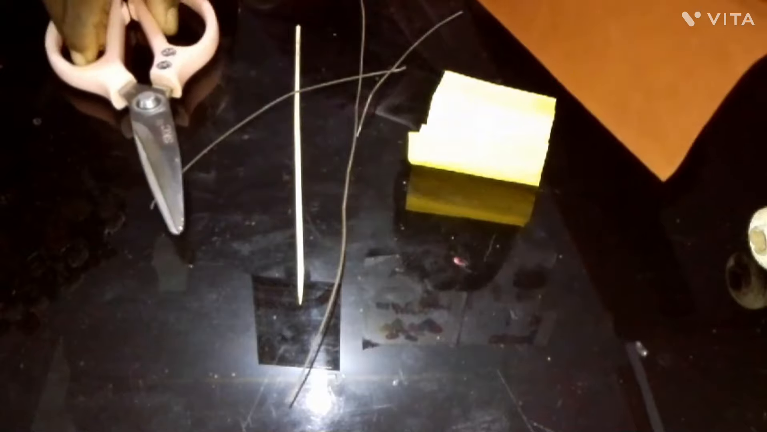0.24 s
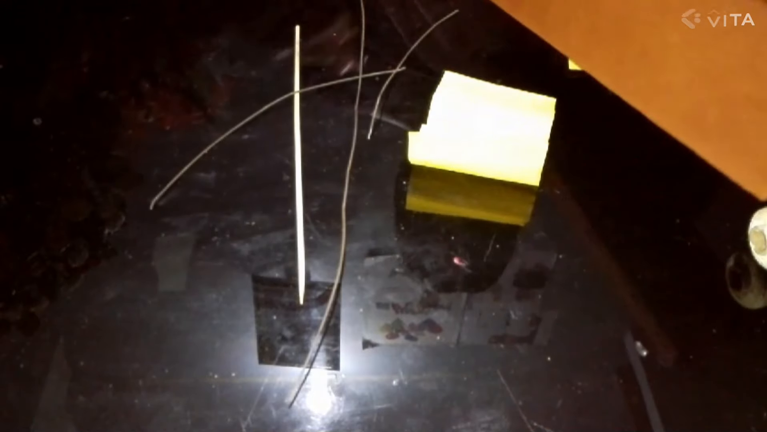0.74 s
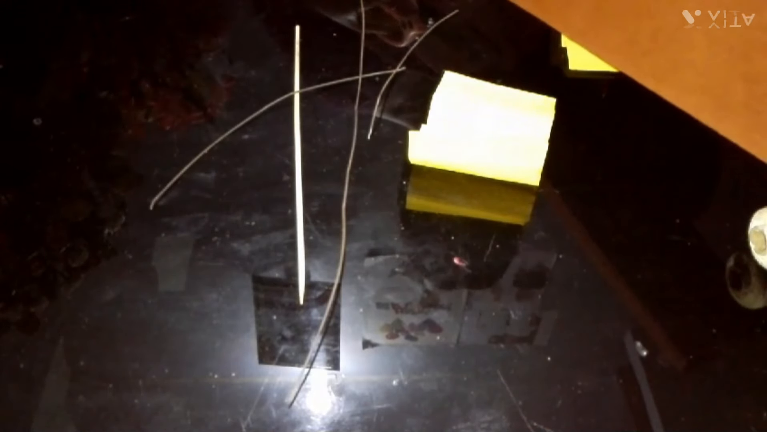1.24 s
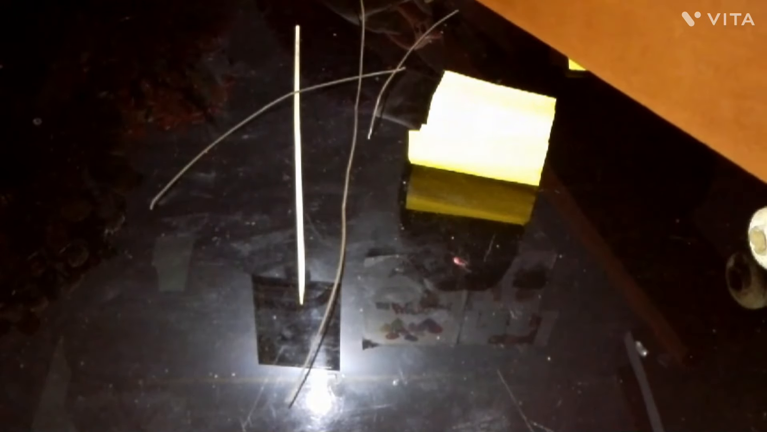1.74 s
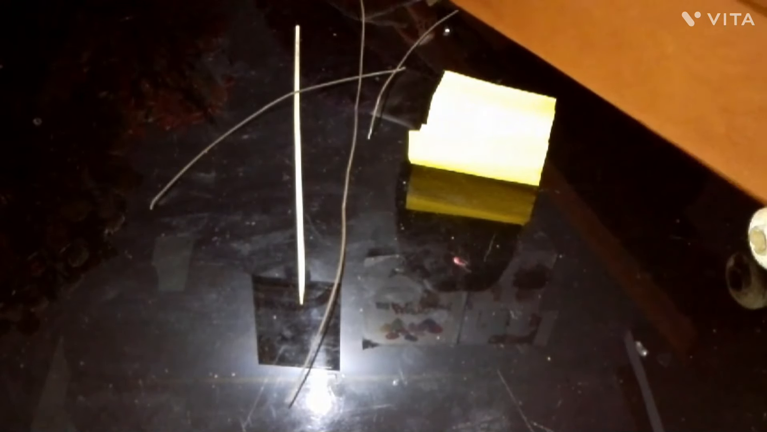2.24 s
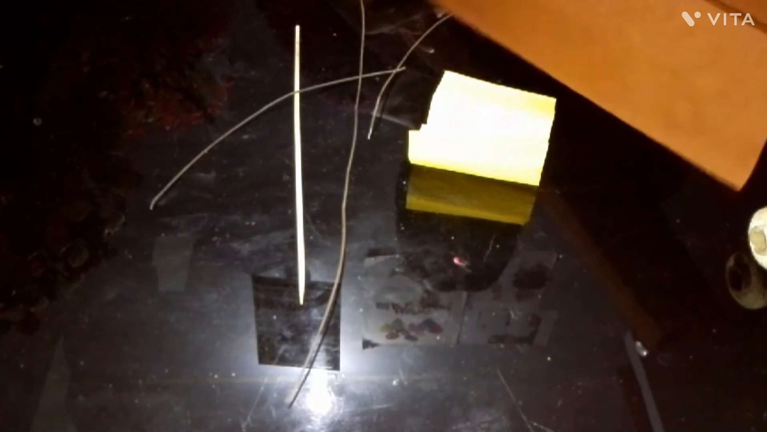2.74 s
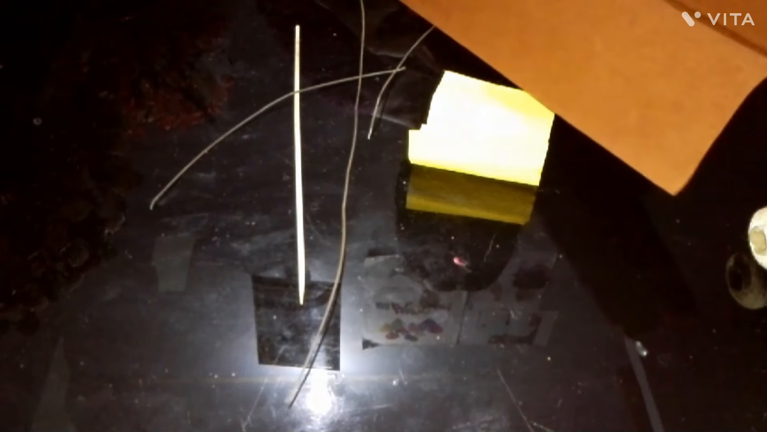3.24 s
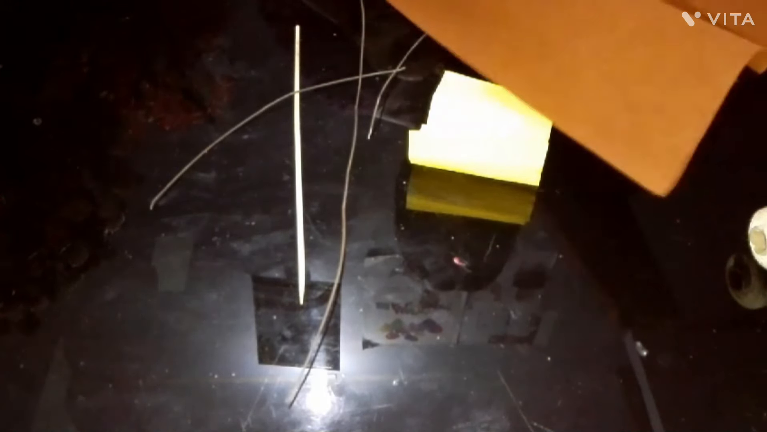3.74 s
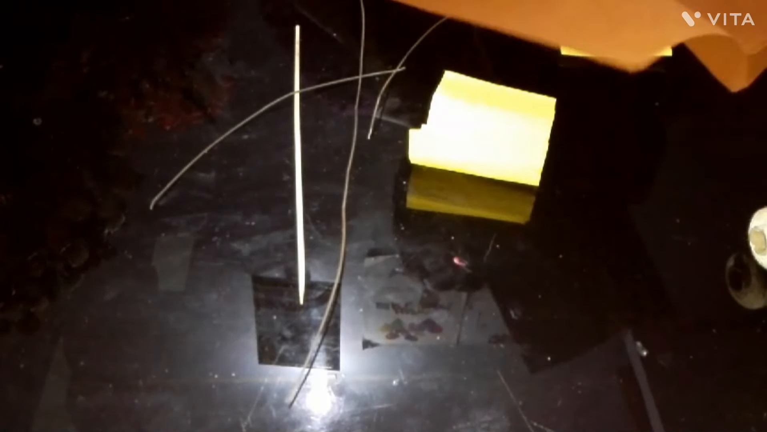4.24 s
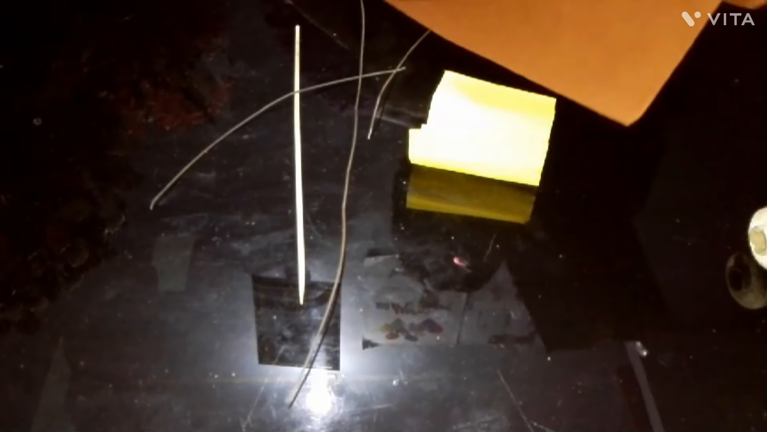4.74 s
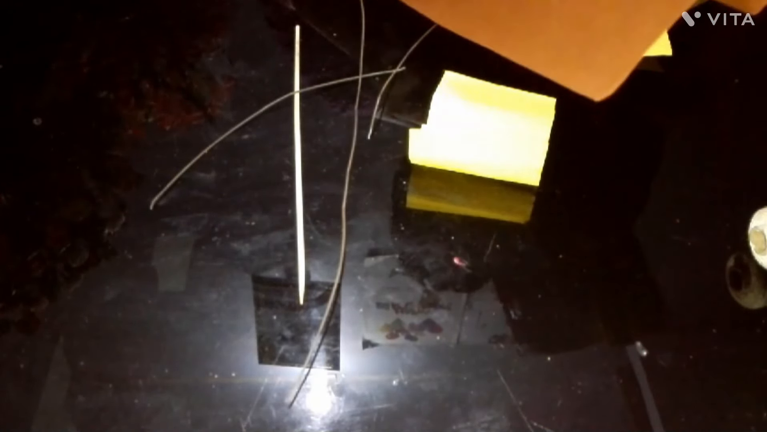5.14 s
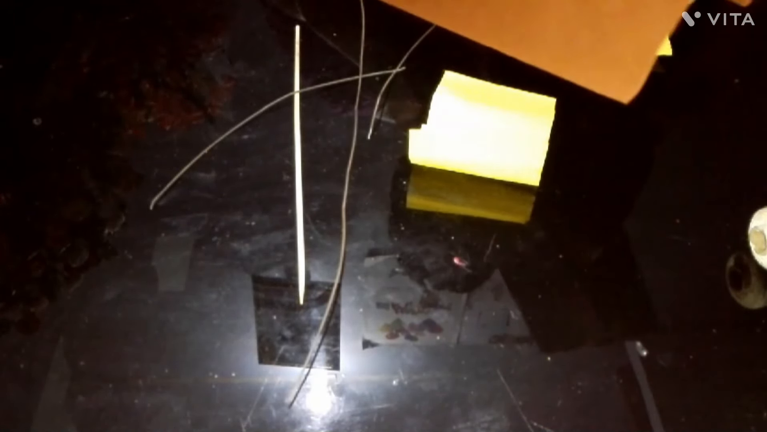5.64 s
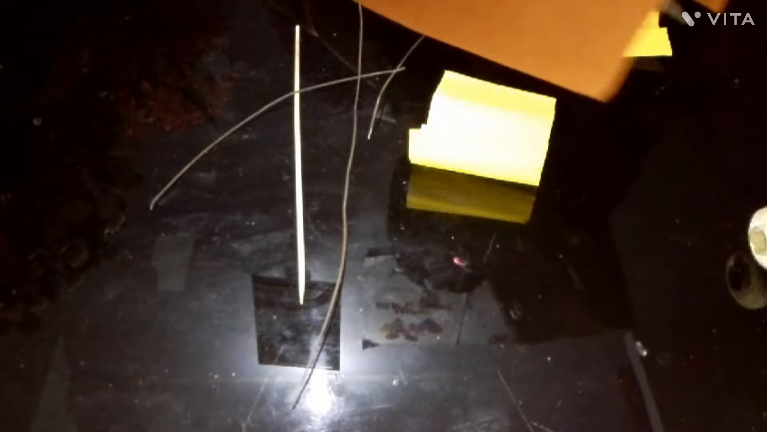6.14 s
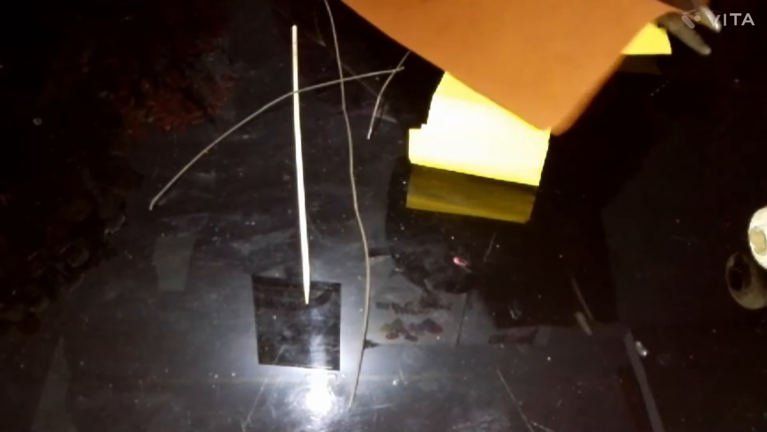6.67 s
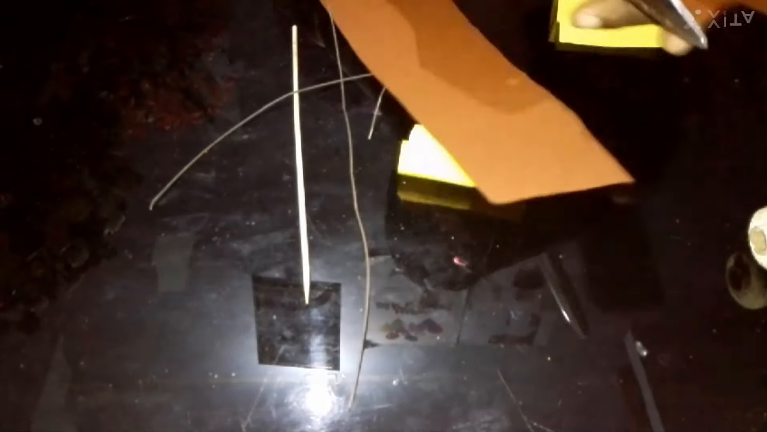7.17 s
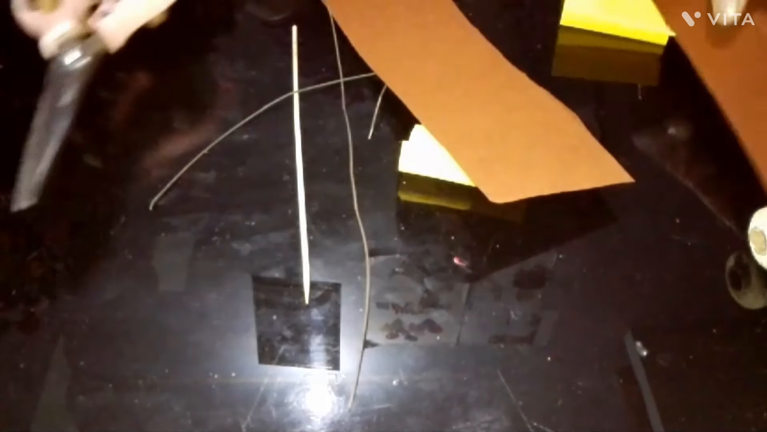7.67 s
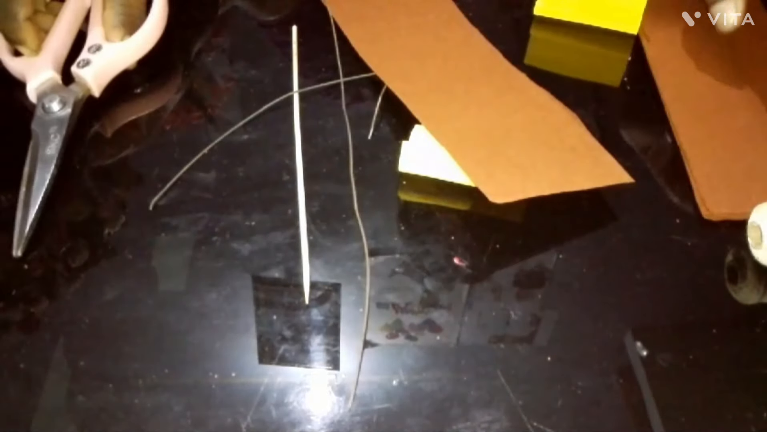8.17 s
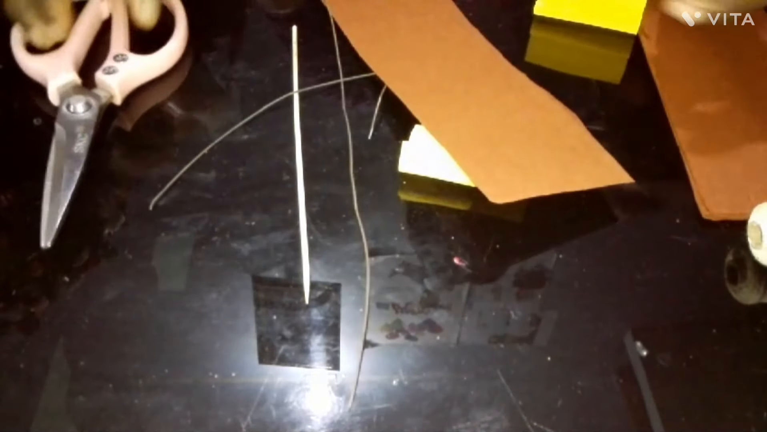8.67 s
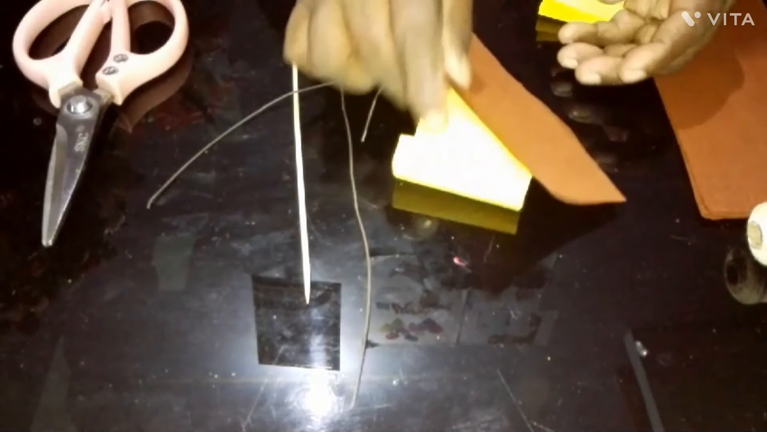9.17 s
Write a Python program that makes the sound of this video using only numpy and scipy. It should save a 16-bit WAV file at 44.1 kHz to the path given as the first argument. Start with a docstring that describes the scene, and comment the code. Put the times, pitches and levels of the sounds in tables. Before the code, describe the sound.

Scissors knock on a hard tabletop, a paper sheet hisses and crackles through cutting, and the scissors land again with a metallic clatter.

```python
"""In a small bare room, sheets of craft paper are rubbed, folded and cut over a hard table.
The paper hisses as its fibres slip in thousands of tiny clicks, and it snaps when a crease gives way.
Scissors knock and clatter on the table top, making both the steel and the table ring.
The room adds a short echo and a low rumble. One small microphone with a strong treble resonance
feeds both channels."""
import sys
import numpy as np
from scipy import signal
from scipy.fft import rfft, irfft
from scipy.io import wavfile

SR = 44100
rng = np.random.default_rng(int(sys.argv[2]) if len(sys.argv) > 2 else 0)


def master_out(mix):
    """Clip the mix to full scale and print it as 16-bit PCM to the path in sys.argv[1]."""
    frames = np.transpose(np.atleast_2d(mix))
    ceiling = np.clip(frames, -1, 1)
    pcm = np.round(ceiling * 32767).astype(np.int16)
    wavfile.write(sys.argv[1], SR, pcm)


N = 414981

# Strokes of hand or blade along the paper: t/s, rise/s, length/s, hiss level/dB, sheet against hiss/dB
STROKES = [(0.0, 0.00082, 0.04, -46.5, 3), (0.096, .04, 0.075, -48, 5), (0.146, .015, 0.094, -40.5, -1),
           (0.779, 0.011, 0.063, -40, -3), (0.91, 0.018, 0.39, -65, -7), (1.546, 0.12, 0.18, -67.5, 4.5),
           (1.946, .01, 0.12, -72.5, 15.5), (2.206, 0.04, .2, -66.5, 0), (2.4, .2, 6.0, -68.5, 3),
           (2.428, 0.094, .12, -51, -9), (2.646, 0.024, 0.19, -53, 2), (2.791, 0.015, 0.054, -52, 7),
           (2.925, 0.13, .17, -48, -1), (3.194, 0.0061, 0.19, -47.5, 2), (3.485, 0.054, .14, -46, 0),
           (3.676, 0.024, 0.2, -45, 1), (3.901, 0.009, 0.047, -38.5, 5), (4.098, 0.01, .27, -44.5, -2),
           (4.4, 0.023, .28, -46.5, 1), (4.722, 0.11, 0.14, -43.5, 4), (5.013, .12, 0.27, -49, 3),
           (5.361, 0.15, 0.14, -48, 6.5), (5.621, 0.21, 0.18, -43.5, -0.5),
           (5.889, 0.028, 0.13, -50.5, 2.5), (6.122, 0.024, 0.17, -46, 1.5), (6.343, .02, 0.07, -49.5, -3),
           (6.531, .01, 0.18, -43.5, 3), (6.89, 0.043, 0.088, -43.5, -0.5), (7.082, .02, 0.2, -47.5, -3),
           (7.343, .02, 0.26, -55.5, -3.5), (7.64, 0.017, 0.39, -54, -0.5), (8.09, .02, 0.3, -54.5, -1.5),
           (8.359, 0.0093, 0.03, -35.5, -8), (9.036, 0.028, .02, -53.5, 17), (9.337, 0.018, .1, -60, 6)]
# Short scuffs of sheet on sheet: t/s, level/dB, sheet against that level/dB
SCUFFS = [(0.038, -33, -28), (0.16, -31.5, 9.5), (0.179, -31, -1), (0.224, -32, -40), (2.0408, -34, -6),
          (2.074, -42, -6), (2.265, -52, -9), (2.315, -51, 4), (2.385, -49, -3), (2.491, -37, -5),
          (2.523, -28.5, -8), (2.588, -41, -20), (3.013, -48, 12), (3.04, -25, -9), (3.0603, -32, -9),
          (3.0995, -23.5, -3), (3.4996, -34, 4), (3.557, -31, -11), (3.575, -38, -2), (3.5966, -25.5, -38),
          (3.7264, -32, -25), (4.0023, -35, -25), (4.1122, -44, 17), (4.165, -39, -2), (4.241, -33, -20),
          (4.4066, -22, -25), (4.4293, -35, -22), (4.591, -28.5, -9), (4.61, -29.5, 2.5),
          (4.6337, -27.5, -3), (4.6803, -46, -29), (4.7757, -29.5, -6), (4.8164, -23, -24),
          (4.837, -21, -12), (4.848, -23.5, -7), (5.4283, -22, -17), (5.449, -24, -23), (5.4785, -12, -31),
          (5.941, -27, -10), (5.9623, -18.5, -7.5), (6.002, -24, -20), (6.3475, -40, -18),
          (6.3755, -28, -24), (6.409, -23, -12), (6.5356, -47, -31), (6.9146, -35, 2.5), (6.9626, -23, -12),
          (6.9865, -25.5, -16)]
# Creases and blade ticks: t/s, level/dB, sheet against that level/dB, treble tilt/(dB per octave), fold f/Hz
SNAPS = [(0.2794, -18, -40, -5.5, 1460), (0.5103, -39, -10, 12, 1400), (0.5538, -36.5, -12, 17, 1520),
         (0.6962, -12, -24, -6.5, 1350), (1.944, -16.5, -13.5, -6, 1650), (2.752, -49, 5, -5, 1570),
         (2.804, -28.5, -3.5, 2, 1160), (2.8173, -19.5, -14, 16, 1340), (2.82, -18, -24, -2, 1640),
         (2.8704, -25, -14, 3, 1460), (3.3883, -30, -22, 11, 900), (3.404, -47, -16, -2, 1380),
         (3.4425, -37, -1.5, 11, 1650), (3.676, -22.5, -21, 2, 1700), (3.6991, -28.5, -8.5, 2, 1390),
         (3.774, -27, -12, -9, 1750), (3.7955, -12.5, -19, 17, 1530), (3.911, -13, -18, -2.5, 1510),
         (3.9164, -11, -12, 14.5, 1320), (4.6624, -22, -14, 0, 1300), (4.8648, -34, -9, -10, 1610),
         (4.8801, -7, -29, 7, 2180), (4.959, -33, -16, -11, 1120), (5.011, -26, -15.5, 0, 1470),
         (5.5098, -4.5, -29, 6, 2300), (5.7838, -32, -36, -14, 1260), (6.0027, -17, -28, -3.5, 1380),
         (6.2897, -29.5, -5.5, -2, 1360), (6.314, -32, -5, 4, 1310), (6.9005, -37, -19, -6, 1520),
         (7.2915, -25.5, -25, -8, 1510), (7.3462, -13, -23.5, 1.5, 2340), (7.651, -28.5, -43, 0, 1510),
         (8.162, -30, -36, -5, 1730), (8.3699, -2, -31, 22, 1820), (8.4864, -33.5, -17, -2, 1500),
         (8.538, -39, -18, 3, 1500)]
# Scissors hitting the table: t/s, level/dB, treble tilt/(dB per octave), table thump level/dB,
# ring against clack/dB, favoured f/Hz
KNOCKS = [(0.5, -24.5, -15.5, -43.5, -7, 1320), (0.621, -14.5, -11, -56, -6, 2080),
          (0.763, -17, -7, -42, -5, 2050), (0.788, -31.5, -3.5, -37, 10, 7000),
          (8.566, -7.5, 1, -36.5, 0, 5800), (8.783, -15.5, -12.5, -50, -20, 1490),
          (8.89, -53, -1, -70, 3.5, 5000), (8.993, -42.5, -7, -60, 2, 5600), (9.05, -1.5, 1, -38, -8, 4170),
          (9.055, -6.5, -2.5, -35, 4.5, 7570), (9.092, -14.5, -19, -53, -20, 1500),
          (9.158, -10.5, -4.5, -63, 2, 3300), (9.193, -9.5, -7.5, -49, -18, 2400),
          (9.215, -11, -7.5, -41, -3, 3280), (9.247, -26, -8, -64, -3, 1490),
          (9.289, -33, -6, -55, -4, 1500)]
# Ringing notes of the scissors and of the table top: f/Hz, level/dB, time to fade by 60 dB/s
SCISSOR_NOTES = [(587, -19, .12), (738, -17, .1), (1290, -11, .12), (1477, -10, .14), (1690, -14, .08),
                 (2057, -10, .13), (2366, -11, .12), (2546, -14, .08), (2821, -15, .08), (2987, -10, .12),
                 (3368, -11, .1), (3675, -9, .2), (3780, -13, .08), (4089, -9, .12), (4168, -8, .15),
                 (4575, -13, .12), (4812, -9, .13), (5350, -16, .1), (5577, -7, .14), (5697, -9, .1),
                 (5970, -13, .07), (6120, -13, .1), (6245, -16, .1), (6640, -16, .1), (6863, -17, .12),
                 (7085, -11, .12), (7292, -11, .1), (7474, -12, .1), (7690, -13, .09), (7962, -12, .1)]
TABLE_NOTES = [(203, 0.5, 0.2), (247, -3.5, 0.15), (330, -5, 0.2), (415, -3.5, 0.06)]
# Tone colours (how strong each pitch is against the others): f/Hz, level/dB
FIBRE_COLOUR = [(700, -35.5), (2500, -4.5), (4500, 6), (6000, 13), (7500, 5.5), (9000, -5.5), (11000, -24)]   # bright hiss of the fibres
SHEET_COLOUR = [(200, -53.5), (500, -12.5), (800, 0), (1400, -2), (2000, -2.5), (3000, -0.5), (4400, -3),
                (6000, -10.5)]   # fuller sound of the whole sheet
SIZZLE_COLOUR = [(3000, -58), (6000, -21.5), (9000, 11), (12000, -19), (14000, 8.5)]   # the paper's highest treble
CLACK_COLOUR = [(120, -58), (300, -7.5), (420, 0.5), (550, -16), (1400, 7), (3000, 7), (5500, 7),
                (6700, 1.5), (8000, -2.5), (10000, 0), (12000, -12), (14000, -10)]   # clack of the scissors
RUMBLE_COLOUR = [(15, -38), (25, -12), (59, -6.5), (81, -9), (150, -2), (176, -4), (224, 0), (363, -7),
                 (475, -15.5), (811, -12), (1090, -14.5), (2630, -23), (6540, -36), (13800, -27.5),
                 (15000, -58)]   # background of the room
# How long the room echoes: f/Hz, time to fade by 60 dB/s
ECHO_TIMES = [(300, 0.15), (1500, 0.47), (6000, 0.37), (12000, 0.25)]


def paper_rustle():
    """Strokes and scuffs make fibres slip; the same tiny clicks drive the hiss, the sheet and the sizzle."""
    fibre_push, sheet_push = np.zeros(N), np.zeros(N)
    for start, rise, length, hiss_db, sheet_db in STROKES:
        fibre_push += stroke(start, rise, length, hiss_db, growth_db=0)
        sheet_push += stroke(start, rise, length, hiss_db + sheet_db, growth_db=3)   # the sheet buckles
    sizzle_push = fibre_push * amp(-10)
    t, scuff_rise_s = np.arange(1500) / SR, 0.0031
    swell = (t / scuff_rise_s * np.exp(1 - t / scuff_rise_s)) ** 2
    for start, level_db, sheet_db in SCUFFS:
        add(fibre_push, start, amp(level_db - 6.5) * swell)
        add(sheet_push, start, amp(level_db + sheet_db - 5.5) * swell)
        add(sizzle_push, start, amp(level_db - 21) * swell)
    slips = fibre_slips(per_s=9000, spread_db=2.5, clump_db=2.5)
    hiss = coloured(slips * fibre_push, FIBRE_COLOUR)
    sizzle = coloured(slips * sizzle_push, SIZZLE_COLOUR)
    sheet = flexing(coloured(slips * sheet_push, SHEET_COLOUR), waver_db=2.8, rate_hz=9)
    sheet = resonance(sheet, hz=1440, width_hz=174, boost_db=8.5)   # air in the curl of the held sheet
    return amp(-6) * hiss + amp(-4.5) * sheet + amp(5) * sizzle


def stroke(start, rise, length, level_db, growth_db):
    """The pressure of one stroke rises, swells towards the middle and dies away after the end."""
    swell_db, fade_db_per_s = 0.5, 201
    t = np.arange(N) / SR - start
    progress = np.clip(t / length, 0, 1)
    shape_db = swell_db * np.sin(np.pi * progress) + growth_db * (progress - .5)
    fade_db = fade_db_per_s * np.clip(t - length, 0, 1)
    return np.clip(t / max(rise, 1e-3), 0, 1) * amp(level_db + shape_db - fade_db)


def fibre_slips(per_s, spread_db, clump_db):
    """Fibres let go at random and in clumps: many small clicks and a few big ones."""
    sizes = amp(spread_db * np.minimum(rng.exponential(1, N), 5)) * rng.choice([-1, 1], N)
    slipping = rng.random(N) < per_s / SR
    return rms_one(sizes * slipping * amp(clump_db * drift(rate_hz=31)))


def flexing(x, waver_db, rate_hz):
    """As the sheet bends, its hollow tones come and go: each half octave wavers on its own."""
    out = x.copy()
    for low_hz in 600 * 2 ** np.arange(0, 3, .5):
        band = keep_band(x, low_hz, low_hz * np.sqrt(2), order=1)
        out += band * (amp(waver_db * drift(rate_hz)) - 1)
    return out


def crease_snaps():
    """A crease gives way: one sharp click, a faint spray of smaller ones and a hollow ring of the fold."""
    spray_db, spray_s, fold_ring_s = -24, 0.0035, .012
    crack, sheet, sizzle = np.zeros((3, N))
    t = np.arange(600) / SR
    sprays = rng.standard_normal((len(SNAPS), len(t))) * amp(spray_db) * np.exp(-t / spray_s)
    for (start, level_db, sheet_db, tilt_db, fold_hz), spray in zip(SNAPS, sprays):
        burst = np.append(np.sign(spray[0]), spray)   # the big click goes first
        fibres = colour_filter(FIBRE_COLOUR, tilt_db, size=512)
        fold = ringing([(fold_hz, level_db + sheet_db - 1, fold_ring_s)], len(t))[0]
        add(crack, start, amp(level_db) * signal.oaconvolve(burst, fibres))
        add(crack, start, fold)
        add(sheet, start, burst * amp(level_db + sheet_db))
        add(sizzle, start, burst * amp(-36 + 0.35 * level_db))   # grows less than the snap does
    sheet, sizzle = coloured(sheet, SHEET_COLOUR), coloured(sizzle, SIZZLE_COLOUR)
    return amp(5.5) * crack + amp(15.5) * sheet + amp(21) * sizzle


def scissor_knocks():
    """A noisy clack sets scissors and table ringing; each blow has its own loudness and brightness."""
    favour_db, favour_octaves = 8.5, 0.091   # where a blow lands lifts the notes around one pitch
    out = np.zeros(N)
    steel, table = ringing(SCISSOR_NOTES, 12000), ringing(TABLE_NOTES, 12000)
    pitches = np.array(SCISSOR_NOTES)[:, 0]
    chance = rng.standard_normal((len(KNOCKS), 3, 4000))
    chatter = np.exp(-np.arange(4000) / SR / 0.015)   # loose blades rattle for a moment
    for knock, (scatter, signs, noise) in zip(KNOCKS, chance):
        start, level_db, tilt_db, thump_db, ring_db, favoured_hz = knock
        lift_db = favour_db * np.exp(-(np.log2(pitches / favoured_hz) / favour_octaves) ** 2)
        notes_db = tilt_db * octaves(pitches) + lift_db + 2.5 * scatter[:len(steel)]
        steel_gains = amp(level_db + ring_db - 14.5 + notes_db) * np.sign(signs[:len(steel)])
        table_gains = amp(thump_db + 1.4 * scatter[-len(table):])
        clack = signal.oaconvolve(noise * chatter, colour_filter(CLACK_COLOUR, tilt_db))
        add(out, start, steel_gains @ steel + table_gains @ table)
        add(out, start, amp(level_db - 12.5) * clack)
    return out


def room_echo(x):
    """The nearest wall answers first; then the echoes blur into noise that fades band by band."""
    wall_delay_s = 0.01065
    t, tail = np.arange(SR // 2) / SR, 0
    noise = rng.standard_normal((2, len(t)))
    for k, low_hz in enumerate(150 * 2 ** np.arange(0, 6.5, .5)):
        band = keep_band(noise[k % 2], low_hz, low_hz * np.sqrt(2), order=2)
        tail = tail + band * amp(-60 * t / at_hz(ECHO_TIMES, low_hz * 3.3))
    near_wall = 0.29 * np.exp(-((t - wall_delay_s) / 0.00055) ** 2)
    build_up = np.clip(t / wall_delay_s, 0, 1) ** 6.4
    tail *= build_up + near_wall
    return signal.oaconvolve(x, tail / np.sqrt(np.sum(tail ** 2)))[:N]


def room_rumble():
    """A low rumble and a faint hiss that waver a little."""
    level_db = -54.5 + 1.2 * drift(rate_hz=6)
    return amp(level_db) * coloured(rng.standard_normal(N), RUMBLE_COLOUR, size=16384)


def amp(db):
    """Turns decibels into a number to multiply by."""
    return 10 ** (np.asarray(db) / 20)


def rms_one(x):
    """Scales a signal so that its average strength (rms) is 1."""
    return x / np.sqrt(np.mean(x ** 2) + 1e-20)


def add(out, start, sound):
    """Mixes a sound in at a time given in seconds."""
    at = round(start * SR)
    out[at:at + len(sound)] += sound[:N - at]


def drift(rate_hz):
    """A smooth random wobble with a typical size of 1."""
    step = 40   # samples between random points
    r = np.exp(-2 * np.pi * step * rate_hz / SR)
    slow = signal.lfilter([1], [1, -2 * r, r * r], rng.standard_normal(N // step + 2002))[2000:]
    return np.interp(np.arange(N) / step, np.arange(len(slow)), rms_one(slow))


def ringing(notes, samples):
    """One fading pure tone for each row of notes."""
    hz, db, fade_s = np.transpose(notes)[:, :, None]
    t = np.arange(samples) / SR
    return amp(db - 60 * t / fade_s) * np.sin(2 * np.pi * hz * t)


def at_hz(table, hz):
    """Looks up a pitch in a table, gliding between the rows."""
    pitches, values = np.transpose(table)
    return np.interp(np.log(hz + 1), np.log(pitches), values)


def octaves(hz):
    """Octaves above 3000 Hz; pitches under 1000 Hz count as 1000 Hz."""
    return np.log2(np.clip(hz, 1000, None) / 3000)


def colour_filter(colour, tilt_db=0, size=2048):
    """A click with the given tone colour, tilted by tilt_db per octave, to use as a filter."""
    hz = np.fft.rfftfreq(size, 1 / SR)
    cepstrum = irfft(np.log(amp(at_hz(colour, hz) + tilt_db * octaves(hz))))
    cepstrum[1:size // 2] *= 2   # these two lines pack the energy at the start (minimum phase)
    cepstrum[size // 2 + 1:] = 0
    click = irfft(np.exp(rfft(cepstrum)))
    return click / np.sqrt(np.sum(click ** 2))


def coloured(x, colour, size=2048):
    """Gives a sound a tone colour."""
    return signal.oaconvolve(x, colour_filter(colour, size=size))[:N]


def keep_band(x, low_hz, high_hz, order):
    """Lets through the pitches between two limits."""
    return signal.sosfilt(signal.butter(order, [low_hz, high_hz], "band", fs=SR, output="sos"), x)


def resonance(x, hz, width_hz, boost_db):
    """Makes a sound louder around one pitch."""
    r, angle = np.exp(-np.pi * width_hz / SR), 2 * np.pi * hz / SR
    band = signal.lfilter((1 - r * r) / 2 * np.array([1, 0, -1]), [1, -2 * r * np.cos(angle), r * r], x)
    return x + (amp(boost_db) - 1) * band


def scene():
    """Paper, scissors and room all reach one microphone."""
    hits = crease_snaps() + scissor_knocks()
    paper = paper_rustle()
    echo = amp(-8.5) * room_echo(hits + 0.69 * paper)
    return np.tile(hits + paper + echo + room_rumble(), (2, 1))


def record(dry):
    """The microphone's opening resonates, the treble differs a little left and right, the top is cut."""
    shelf_hz, cutoff_hz = 14150, 15628
    x = resonance(dry, hz=6800, width_hz=797, boost_db=11.5)
    treble = keep_band(x[0], 4800, 11000, order=4)
    smear = rms_one(rng.standard_normal(400)) / 20   # nine milliseconds of noise
    flicker = amp(-17) * drift(rate_hz=60) * signal.oaconvolve(treble, smear)[:N]
    x = np.tanh(x + flicker * [[1], [-1]])   # tanh rounds off the loudest peaks
    dulled = x * amp(-22) + signal.sosfilt(signal.ellip(10, .3, 50, shelf_hz, fs=SR, output="sos"), x)
    return signal.sosfilt(signal.ellip(10, .3, 60, cutoff_hz, fs=SR, output="sos"), dulled)


dry = scene()
out = record(dry)
master_out(out)
```